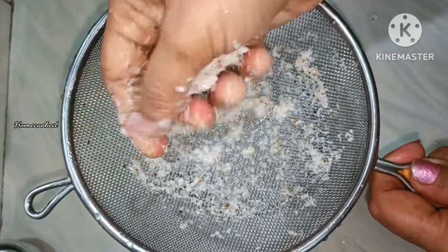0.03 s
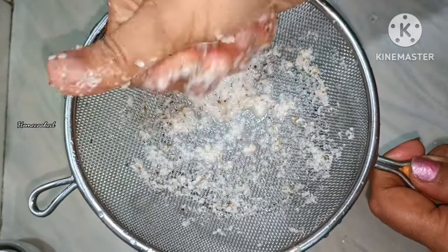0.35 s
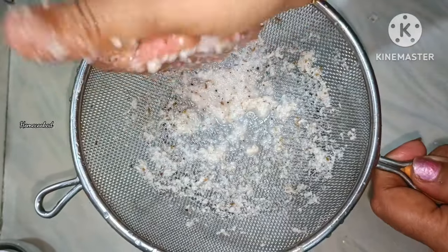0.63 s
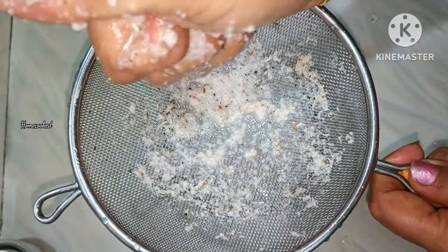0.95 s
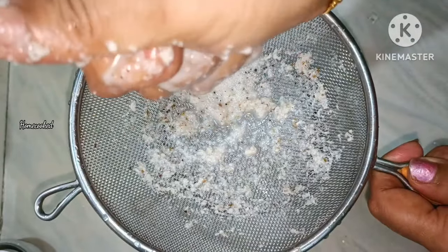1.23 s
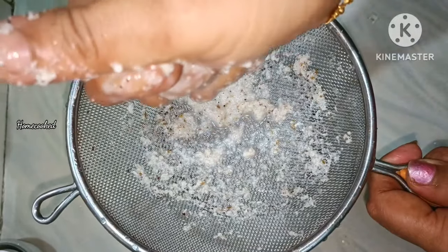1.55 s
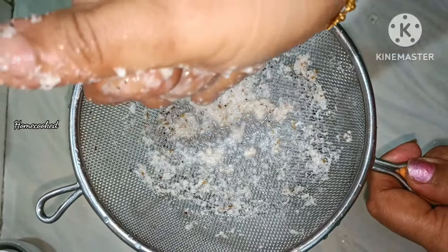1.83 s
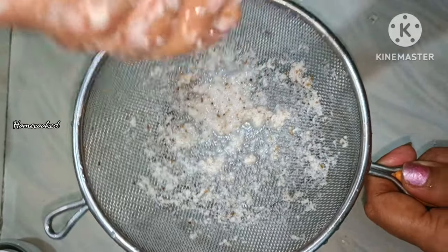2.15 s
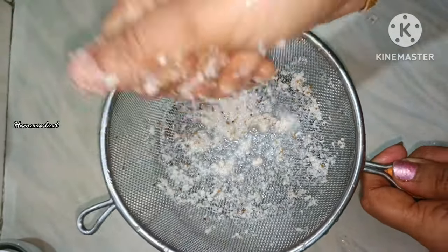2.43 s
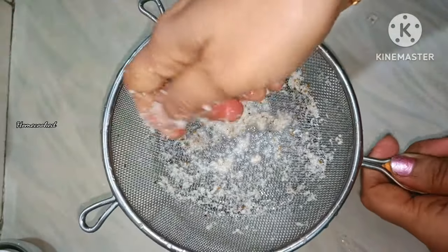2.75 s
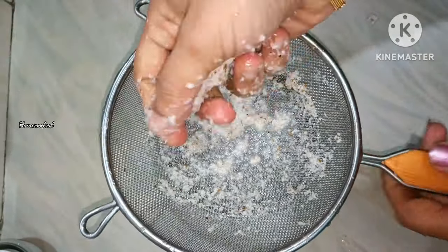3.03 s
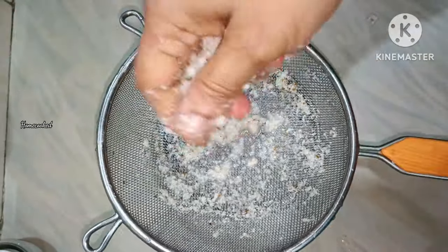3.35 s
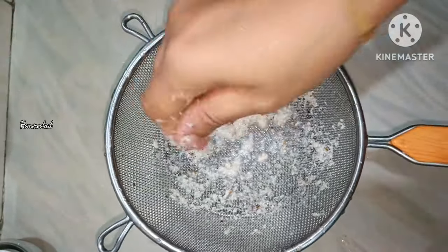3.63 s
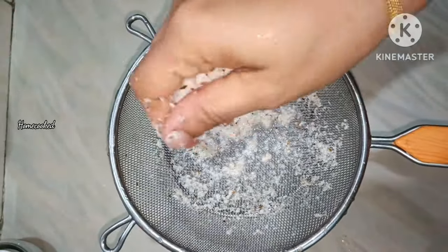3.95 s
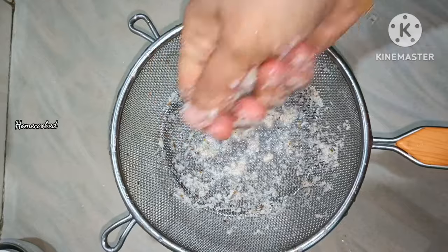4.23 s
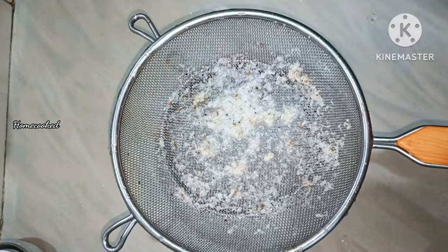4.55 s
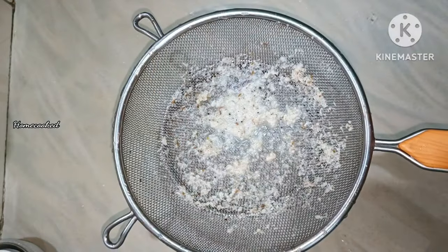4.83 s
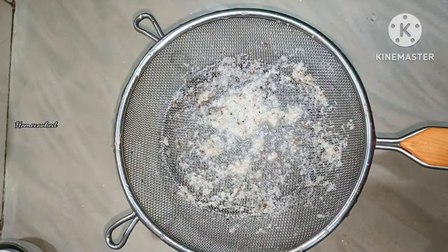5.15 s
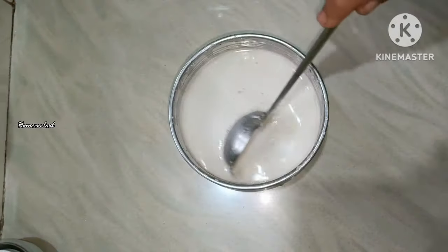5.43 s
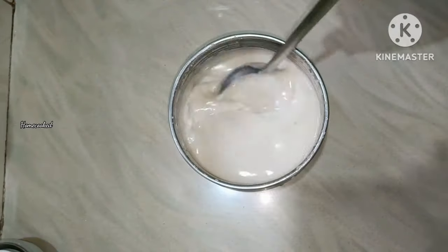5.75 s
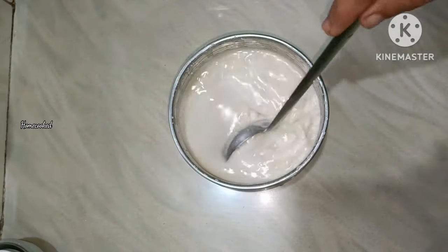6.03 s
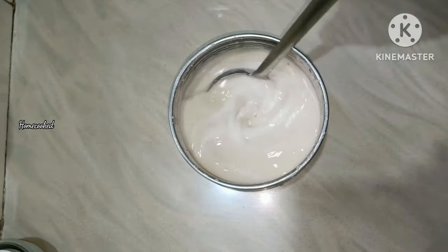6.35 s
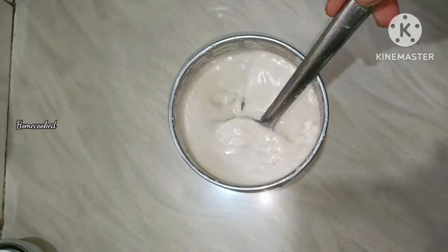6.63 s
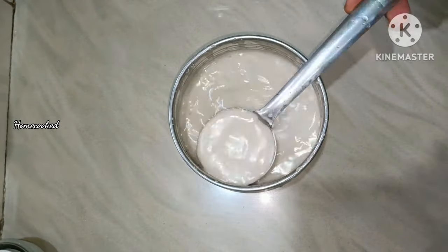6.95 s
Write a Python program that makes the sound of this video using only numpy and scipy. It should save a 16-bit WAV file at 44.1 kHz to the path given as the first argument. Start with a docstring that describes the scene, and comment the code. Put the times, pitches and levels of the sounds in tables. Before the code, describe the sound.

Wet pulp is squeezed by hand, with small drips and spits, then a spoon stirs liquid and knocks against a steel pot.

```python
"""Wringing and stirring coconut milk

Close stereo microphone in a small, hard-walled kitchen, its hiss under everything. A hand wrings wet
ground coconut over a mesh strainer: air pockets snap, milk spits between the fingers, drops plink into
the pot below and the strainer bumps the rim. Then a spoon stirs the milk and knocks against the full
steel pot, whose ring the liquid damps."""
import sys
import numpy as np
from scipy import signal
from scipy.fft import rfft, irfft, next_fast_len
from scipy.io import wavfile
from scipy.ndimage import map_coordinates

SR = 44100
rng = np.random.default_rng(int(sys.argv[2]) if len(sys.argv) > 2 else 0)


def int16_out(signal):
    """Quantize to a 16-bit WAV file."""
    q = np.round(np.clip(np.atleast_2d(signal).T, -1, 1) * 32767)
    wavfile.write(sys.argv[1], SR, q.astype(np.int16))


N = 307801
TIME = np.arange(N) / SR
AGE = np.arange(SR // 2) / SR  # seconds since the start of one short sound


def amp(db):
    """Decibels to gain."""
    return 10 ** (np.asarray(db) / 20)


def unit(x):
    """x at rms 1."""
    return x / np.sqrt(np.mean(x ** 2) + 1e-20)


def along(points, hz):
    """(Hz, value) points read on a log axis."""
    f, values = np.transpose(points)
    return np.interp(np.log(hz + 1), np.log(f + 1), values)


def fade(t, t60):
    """Exponential decay, 60 dB down at t60."""
    return np.exp(-np.log(1000) * t / t60)


def bell(half_length):
    """A smooth swell that peaks three half lengths after its start."""
    t = np.arange(-3 * half_length, 3 * half_length, 1 / SR)
    return np.exp(-0.5 * (t / half_length) ** 2)


def wobble(size, rate):
    """A smooth random curve, rate knots a second."""
    knots = rng.standard_normal(int(size * rate / SR) + 2)
    return map_coordinates(knots, [np.arange(size) * rate / SR])


def add(track, s, sound):
    """Mix a sound into a track at s seconds."""
    part = track[..., round(s * SR):][..., :sound.shape[-1]]
    part += sound[..., :part.shape[-1]]


def filtered(x, response):
    """x through a frequency response."""
    size = x.shape[-1]
    padded = next_fast_len(size + SR // 4)
    return irfft(rfft(x, padded) * response(np.fft.rfftfreq(padded, 1 / SR)), padded)[..., :size]


def coloured(x, spectrum):
    """x shaped by (Hz, dB) points, at rms 1."""
    return unit(filtered(x, lambda hz: amp(along(spectrum, hz))))


def resonant(x, peaks):
    """x with the bands of some (Hz, width Hz, dB) resonances lifted."""
    return filtered(x, lambda f: 1 + sum(amp(db) * 1j * f * width / (hz * hz - f * f + 1j * f * width)
                                         for hz, width, db in peaks))


def ring(hz, t60, attack, fall=0):
    """A damped vibration that takes a moment to build; its pitch may fall, in octaves a second."""
    octaves = np.cumsum(fall * np.ones(len(AGE))) / SR
    turns = hz * (np.cumsum(2 ** -octaves) - 1) / SR
    return np.sin(2 * np.pi * turns) * fade(AGE, t60) * (1 - np.exp(-AGE / attack))


def crackle(rate, size):
    """Random tiny impulses, rate a second."""
    return (rng.random(size) < rate / SR) * rng.standard_normal(size)


def swarm(size, hz, octaves, rate=4000):
    """Tiny bursts, rate a second, that ring in a band round hz; rms 1."""
    bursts = crackle(rate, size)
    return unit(filtered(bursts, lambda f: 1 / (1 + (np.log2((f + 1) / hz) / octaves) ** 2) ** 0.81))


def placed(x, lead, pan_db=0):
    """At the microphone: the left port hears x lead seconds earlier and pan_db louder than the right."""
    sides = np.array([[1], [-1]])
    return filtered(x, lambda hz: np.exp(1j * np.pi * hz * lead * sides)) * amp(sides * pan_db / 2)


# the kitchen's decay: f/Hz, t60/s
KITCHEN_DECAY = [(100, 0.67), (400, 0.74), (1200, 0.31), (2500, 0.59), (9000, 0.045)]
# standing waves between the worktop and the walls: f/Hz, width/Hz, level/dB
STANDING_WAVES = [(423, 17, 0.5), (485, 8.6, -1), (648, 8.8, 4), (754, 8.8, -8), (846, 13, 0), (948, 22, 4),
                  (1287, 8.9, -1)]

def kitchen(x, wet_db, alike, gap):
    """A close sound and the room's answer gap seconds later; alike weights what both ports share."""
    left, right, shared = rng.standard_normal((3, SR // 2))
    hz, t, bands = signal.stft(np.array([left, right]) + alike * shared, SR, nperseg=256)
    decay = fade(t, along(KITCHEN_DECAY, hz)[:, None])
    tail = signal.istft(bands * decay, SR, nperseg=256)[1][:, :len(AGE)]
    early_lift = 1 + 2.2 * fade(AGE, 0.092)  # the worktop and near walls come first
    tail = resonant(tail * (AGE > gap) * early_lift, STANDING_WAVES)
    wet = signal.fftconvolve(x.mean(axis=0)[None], tail / np.linalg.norm(tail[0]), axes=1)
    return x + amp(wet_db) * wet[:, :x.shape[1]]


# the quiet kitchen's spectrum: f/Hz, level/dB
MURMUR_TONE = [(20, -8), (65, 6), (120, 5.5), (185, -1), (225, 7), (285, -3.5), (340, -3), (410, 3),
               (470, -5), (510, 4), (630, -3.5), (695, 8.5), (860, -10), (950, 2.5), (1040, -5.5),
               (1150, -10.5), (2000, -8), (4000, -42)]
# how alike it is at the two ports: f/Hz, correlation
MURMUR_LIKENESS = [(60, 0.75), (290, 0.35), (640, 0.45), (1400, 0.54)]

def room_murmur():
    """Low room tone all round the microphone, partly shared by both ports."""
    def mid_side_gains(hz):
        angle = np.arccos(np.clip(along(MURMUR_LIKENESS, hz), -1, 1)) / 2
        return np.array([np.cos(angle), np.sin(angle)])
    mid, side = filtered(rng.standard_normal((2, N)), mid_side_gains)
    murmur = amp(-69.5) * coloured(np.array([mid + side, mid - side]), MURMUR_TONE)
    return placed(murmur, lead=0.00023)


# hiss spectra of the left and right microphone ports: f/Hz, level/dB
LEFT_PORT = [(300, -20.5), (1200, -9.5), (1550, -12.5), (2330, -6), (3450, -4), (4820, -0.5), (5080, -6),
             (5340, 6.5), (5600, -2.5), (5860, -3), (6120, -0.5), (6370, -4), (6720, -6), (6980, 2),
             (7240, -7), (7670, 4), (8010, -3.5), (8270, 3.5), (8530, 2.5), (9470, 3), (10420, -3.5),
             (11110, 0.0), (14560, -9.5), (14900, -22), (15160, -4), (15250, -26.0), (15330, -49.0),
             (15500, -55.0), (15700, -32)]
RIGHT_PORT = [(300, -21.5), (1200, -12.5), (1550, -9.5), (1810, -19), (2070, -6.5), (2760, -10),
              (3010, -0.5), (3450, -6.5), (4220, 0.5), (4910, 0), (5170, 2.5), (5860, 3), (6030, -1.5),
              (6200, 0.5), (7150, -2), (8100, -1.5), (8700, -10), (9040, -2), (9390, -0.5), (10080, -3),
              (11370, 0), (12320, -7), (13180, 0.5), (14380, 0), (14640, 6), (14900, -3), (15250, 6.5),
              (15500, 5), (15700, -45)]
HISS_BEFORE_DB, HISS_AFTER_DB, HISS_STEP_S = -46.5, -50, 5.53

def microphone_hiss():
    """Each port's own hiss, coloured by its narrow duct; the level steps down at 5.53 s."""
    hiss = np.array([coloured(rng.standard_normal(N), tone) for tone in (LEFT_PORT, RIGHT_PORT)])
    return amp(np.where(TIME < HISS_STEP_S, HISS_BEFORE_DB, HISS_AFTER_DB)) * hiss


# dry ticks close up, from air pockets in wet pulp and froth, the last (5.966 s) from the spoon: t/s, level/dB,
# f/Hz
DRY_TICKS = [(.069, -33, 6400), (0.302, -29, 6250), (0.522, -27, 6200), (0.618, -30, 5200),
             (.683, -29, 11600), (.691, -26, 11000), (0.723, -27, 3750), (0.7485, -24, 8750),
             (0.7628, -27, 8300), (0.967, -25, 8500), (0.9866, -18.5, 8600), (1.064, -25, 8650),
             (1.079, -18.5, 8900), (1.082, -29, 8800), (1.193, -25.5, 8300), (1.8774, -21, 8900),
             (2.1752, -21.5, 4300), (5.966, -20, 5170)]

def ticks():
    """Dry, faintly pitched ticks: single air pockets break in the pulp, and once the spoon ticks."""
    out = np.zeros(N)
    for s, db, hz in DRY_TICKS:
        spray_tone = [(hz / 6, -55), (hz / 2, -26), (hz, 0), (2 * hz, -12)]
        spray = coloured(rng.standard_normal(len(AGE)), spray_tone) * fade(AGE, 0.0086)
        tick = ring(hz, 0.0026, attack=0.0006) + 0.4 * spray
        add(out, s, amp(db) * tick / np.abs(tick).max())
    return kitchen(placed(out, lead=0.00004), wet_db=-2.5, alike=0.49, gap=0.00066)


# drops landing in the pot, just left of centre:
# t/s, relative level/dB, bubble f/Hz, t60/cycles, pitch rise/(octaves/s), relative room level/dB
MILK_DROPS = [(0.079, -28, 1235, 19, -26, -10.5), (0.143, -33.5, 2500, 8.4, 28, -5.5),
              (0.348, -12.5, 1960, 16.5, 61, -15.5), (0.3833, -23, 3170, 21, 21, -11.5),
              (0.577, -37.5, 3040, 14, 40, -6), (0.589, -33, 2910, 29, 14.5, -15),
              (0.601, -35, 2175, 19, 6, -13), (1.368, -39.5, 3250, 12, 30, -8),
              (1.898, -31.5, 1250, 18, 28, -12), (2.168, -40.5, 1680, 32, 13, -11),
              (2.176, -22, 3230, 25, 47, -14.5), (2.263, -19, 2103, 22, 15, -15.5),
              (2.503, -44, 1260, 47, 4, -22), (3.809, -51, 2040, 27, 5, -6),
              (3.9931, -45.5, 2380, 24, 10, -14), (4.0335, -51, 2200, 18, 10, -10),
              (4.256, -53.5, 980, 23, 6, -11.5), (4.697, -47, 2110, 14, 10, -5)]
RISE_S = 0.0096  # a bubble's pitch glides only while it nears the surface
TAIL_OCTAVES = 0.24  # the afterring stays this close to the bubble's pitch

def drops():
    """Each drop slaps the milk and traps a bubble that rings briefly in the thick liquid."""
    out = np.zeros((2, N))
    low_cut = signal.butter(4, 900, "high", fs=SR, output="sos")
    for s, db, hz, cycles, rise, wet_db in MILK_DROPS:
        bubble = ring(hz, cycles / hz, attack=0.00036, fall=-rise * (AGE < RISE_S))
        spray = 0.1 * rng.standard_normal(len(AGE)) * fade(AGE, 0.062)
        slap = ring(1790, 0.0062, attack=0.0015) + ring(3600, 0.0068, attack=0.00061) + spray
        slap_db = -14 + 17.5 * np.log2(hz / 2020)  # the smaller the bubble, the more slap is heard
        plink = signal.sosfilt(low_cut, bubble + amp(slap_db) * slap)
        plink = amp(db + 2.5) * plink / np.abs(plink).max()
        direct = placed(plink, lead=0.00007, pan_db=2.5)
        tail = kitchen(direct, wet_db=wet_db + 6.5, alike=0.35, gap=0.0049) - direct
        tail_hz = hz * 2 ** (rise * 0.0033)  # the bubble's pitch partway through its glide
        tail = filtered(tail, lambda f: 1 / (1 + 1j * np.log2((f + 1) / tail_hz) / TAIL_OCTAVES))
        add(out, s + 0.00049, direct + tail)
    return out


# fingers kneading the pulp above the pot: t/s, level/dB, half length/s, f/Hz
KNEADS = [(0.33, -69.5, 0.092, 265), (0.618, -50, 0.0051, 780), (0.715, -57.5, 0.04, 820),
          (1.325, -60.5, 0.013, 770), (1.699, -56, 0.016, 640), (3.236, -65.5, .11, 370),
          (3.274, -65.5, 0.056, 1020), (3.71, -59.5, 0.035, 690), (3.793, -60, 0.026, 1100),
          (4.044, -60, 0.02, 990), (4.257, -63, 0.0085, 980), (4.734, -62.5, 0.036, 635)]
# the air in the pot under the strainer: f/Hz, width/Hz, level/dB
POT_CAVITY = [(400, 130, 3), (688, 73, 5), (972, 49, 3), (1035, 45, 3), (2070, 120, 27.5)]

def squelches():
    """The pulp gives way in uneven lumps, with sparse bursts that sound the pot's air."""
    out = np.zeros(N)
    for s, db, half_length, hz in KNEADS:
        swell = bell(half_length)
        lumps = amp(2.5 * wobble(len(swell), rate=90))
        bursts = swarm(len(swell), hz, octaves=0.33, rate=900)
        squelch = unit(resonant(lumps * bursts, POT_CAVITY))
        add(out, s - 3 * half_length, amp(db) * swell * squelch)
    return out


# the fist tightening over the strainer: t/s, level/dB, half length/s
FIST_SQUEEZES = [(0.752, -34.5, 0.012), (0.976, -45, 0.01), (1.083, -39.5, 0.0066), (1.201, -52.5, 0.024)]

def spits():
    """Milk seeps with a broad fizz, then spits as a fine spray through the gaps between the fingers."""
    out = np.zeros(N)
    def spray(s, db, half_length, hz, octaves):
        swell = bell(half_length)
        add(out, s - 3 * half_length, amp(db) * swell * swarm(len(swell), hz, octaves))
    for s, db, half_length in FIST_SQUEEZES:
        spray(s - 5.7 * half_length, db - 9, 2.6 * half_length, hz=7700, octaves=1)  # seep
        spray(s, db, half_length, hz=8270, octaves=0.19)  # spit
    # only the hardest squeeze splatters onto the mesh
    s, _, half_length = max(FIST_SQUEEZES, key=lambda row: row[1])
    spray(s + half_length / 2, -44, half_length, hz=2530, octaves=0.29)
    return out


def pulp():
    """The hand wrings the pulp close to the microphone, off to the left."""
    direct = placed(spits() + squelches(), lead=0.000216, pan_db=7.5)
    return kitchen(direct, wet_db=-7, alike=0.92, gap=0.00274)


# the strainer's mesh, first row at the bump: t/s, level/dB, f/Hz, t60/s, width/octaves
MESH_RATTLES = [(2.621, -46, 1400, 0.053, 0.67), (2.622, -42, 2200, 0.032, 0.26),
                (1.5, -42, 8000, 0.02, 0.9)]
# pot and strainer ringing after the bump: f/Hz, level/dB, t60/s, attack/s
RIM_MODES = [(90, -48, 0.38, 0.018), (121, -50, 0.3, 0.028), (250, -51, 0.2, 0.0092),
             (404, -55, 0.26, .008), (1001, -59, 0.42, .003)]

def strainer():
    """The mesh gives one high tick; later it bumps the rim and rattles, and the pot hums briefly."""
    rattle, hum = np.zeros((2, N))
    for s, db, hz, t60, octaves in MESH_RATTLES:
        add(rattle, s, amp(db) * swarm(len(AGE), hz, octaves) * fade(AGE, t60))
    bump_s = MESH_RATTLES[0][0]
    add(hum, bump_s, sum(amp(db) * ring(hz, t60, attack) for hz, db, t60, attack in RIM_MODES))
    return hum + kitchen(placed(rattle, lead=0.0001), wet_db=-4, alike=0.68, gap=0.0033)


def struck(modes, pitch=1):
    """A group of steel modes, a little different at each blow; peak 1."""
    sound = np.zeros(len(AGE))
    for hz, db, t60 in modes:
        gain = amp(db + rng.normal(0, 0.57))
        detune = 1 + rng.normal(0, 0.0079)
        sound += gain * ring(pitch * hz * detune, t60, attack=0.0028)
    return sound / np.abs(sound).max()


# spectra of the spoon's click and of its sharp edge: f/Hz, level/dB
CLICK_SPECTRUM = [(800, -37), (2800, 2.5), (3800, 2), (4400, -3.5), (5100, 16), (6200, 7.5), (8300, 3),
                  (10500, -11), (13000, -10), (15300, -20)]
EDGE_SPECTRUM = [(2000, -28), (7500, -6), (9000, 8), (11500, -11), (14500, 6)]
# the spoon's own ring: f/Hz, level/dB, t60/s
SPOON_MODES = [(4570, 2, 0.13), (5582, -1, 0.18), (7620, 0, .2), (8600, -7, .15), (15150, 3, 0.13)]

def steel_click():
    """Steel meets steel with a sharp-edged click that leaves the spoon ringing."""
    click = coloured(rng.standard_normal(len(AGE)), CLICK_SPECTRUM) * fade(AGE, 0.036)
    ringing = struck(SPOON_MODES)
    edge = coloured(rng.standard_normal(len(AGE)), EDGE_SPECTRUM) * fade(AGE, 0.02)
    return click + amp(-11) * ringing + amp(-8.5) * edge


# the spoon against the pot, close up, the 6.724 s row being the near wall's strong return of the knock before
# it; # thud, upper modes and click are set against the lower wall modes: # t/s, relative level/dB, wall f/Hz,
# thud level/dB, upper f/Hz, upper level/dB, click level/dB
SPOON_KNOCKS = [(5.455, -38.5, 1325, -14, 2150, -9, -23), (5.7347, -32.5, 1235, -43, 2150, -23, -27),
                (5.8574, -17.5, 1363, -38, 2197, 2.5, 1.5), (5.8675, -28, 1400, -25, 2190, 6, -8),
                (5.9484, -29, 1470, -26, 2160, -12, -25), (5.972, -31.5, 1390, -22, 2100, -1, -17),
                (5.979, -32.5, 1560, -14, 2180, 2, -11), (6.083, -43.5, 1350, -25, 2690, 7, 17.5),
                (6.184, -44.5, 1450, -35, 2090, -1, -25), (6.196, -36, 1370, -30, 2130, -6, -25),
                (6.4895, -24.5, 1288, -22.5, 2150, 2, -2.5), (6.522, -43, 1370, -20, 2090, 16, -10),
                (6.5324, -28.5, 1530, -16, 2040, 7.5, -11), (6.7099, -5, 1263, -12, 2240, -11, -24.5),
                (6.724, -26, 1340, -5, 2210, -8, -24), (6.741, -31, 1300, -7, 2356, -1, -13),
                (6.871, -8.5, 1119, -25, 2160, -8.5, -18), (6.877, -15.5, 1460, -28, 3000, -9, -25),
                (6.8877, -18.5, 1412, -18, 3030, -16, -25)]
# the milk-filled pot, struck on the bottom: f/Hz, level/dB, t60/s
BOTTOM_MODES = [(87.6, -35, 0.85), (243.4, -32, 0.81), (364, -26, 0.75), (455, -4.5, 0.075),
                (610, 1.5, 0.051), (787, 17, 0.022)]
# wall modes that shift with the sloshing milk and the point of contact: frequency ratio, level/dB, t60/s
LOWER_WALL_MODES = [(.83, -18, 0.1), (.93, -9.5, 0.092), (1, 19, 0.017), (1.002, -29, 0.23),
                    (1.11, 4, .035), (1.2, -39, 0.042), (1.33, -6, 0.028)]
UPPER_WALL_MODES = [(1, 15.5, 0.012), (1.1, 7, 0.019), (1.39, -0.5, 0.022), (1.7, 2, 0.016)]
ECHO_S = 0.0145  # a nearby kitchen wall throws each knock back

def knocks():
    """The spoon knocks on the milk-damped pot: dull on the bottom, brighter on the wall."""
    out = np.zeros((2, N))
    for s, db, wall_hz, thud_db, upper_hz, upper_db, click_db in SPOON_KNOCKS:
        click = steel_click()
        body = struck(LOWER_WALL_MODES, wall_hz)
        body += amp(thud_db) * struck(BOTTOM_MODES)
        body += amp(upper_db) * struck(UPPER_WALL_MODES, upper_hz)
        knock = amp(db - 4.5) * (body + amp(click_db) * click)
        add(out, s, kitchen(placed(knock, lead=0.00009), wet_db=-6.5, alike=0.58, gap=0.0032))
        add(out, s + ECHO_S, amp(db - 26) * body)
    return out


# strokes of the spoon round the pot: t/s, length/s, level/dB, opening surge/dB
SPOON_STROKES = [(5.467, 0.12, -59.5, 5), (5.649, 0.16, -59, 4), (5.852, 0.26, -52.5, 16.5),
                 (6.454, 0.11, -48.5, -1.5), (6.597, 0.1, -48.5, 3.5), (6.698, 0.32, -55, 0)]
BITE_S, SURGE_S, SETTLE_T60_S = 0.0081, 0.029, 0.22

def spoon_drag():
    """How hard the spoon drags: each stroke bites with a surge, holds while the milk laps, and fades."""
    drag = np.zeros(N)
    for s, length, db, surge_db in SPOON_STROKES:
        held = np.minimum(TIME / BITE_S, 1) * fade(np.maximum(TIME - length, 0), SETTLE_T60_S)
        add(drag, s, held * amp(db + surge_db * np.exp(-TIME / SURGE_S)))
    lapping = amp(2.5 * wobble(N, rate=27))
    return drag * lapping


# spectrum of the spoon's scrape in the pot: f/Hz, level/dB
SCRAPE_TONE = [(150, -51), (250, -6.5), (350, -66), (800, -12), (1270, 5.5), (1800, -14), (2400, -5),
               (3300, -7.5), (8000, -12)]
# the pot's resonance moves as the milk rises and falls: t/s, pitch ratio
POT_PITCH = [(5.6, 1.01), (5.68, 0.94), (5.8, 1.11), (5.97, 1.17), (6.12, 0.98), (6.2, 1.19), (6.6, .93),
             (6.66, 1.03), (6.98, 0.91)]
# large bubbles and hollow sloshes, and the pot's low mode ringing near 250 Hz: t/s, level/dB, f/Hz, t60/s,
# pitch fall/(octaves/s)
GLOOPS_AND_POT_RINGS = [(5.875, -46.5, 247, 0.22, 0), (5.94, -45.5, 547, 0.094, 3.5), (5.987, -59.5, 255, 0.59, 1),
                        (6.5092, -27, 715, 0.025, 119), (6.52, -51, 247, 0.15, 0), (6.64, -34, 806, 0.041, 0)]

def stirring():
    """The spoon scrapes round the pot and folds the milk into large bubbles; now and then the pot's low mode
    hums."""
    scrape = coloured(crackle(rate=1700, size=N), SCRAPE_TONE)
    pitch = np.interp(TIME, *np.transpose(POT_PITCH))
    stir = spoon_drag() * map_coordinates(scrape, [np.cumsum(pitch)], mode="wrap")
    for s, db, hz, t60, fall in GLOOPS_AND_POT_RINGS:
        add(stir, s, amp(db) * ring(hz, t60, attack=0.0074, fall=fall))
    return kitchen(placed(stir, lead=0.00005), wet_db=-6.5, alike=0.24, gap=0.00486)


def spoon():
    """Stirring and knocks together, 2 dB louder at the left port than at the right."""
    return (stirring() + knocks()) * amp([[1], [-1]])


def scene():
    """Wringing, then stirring, from one microphone position beside the pot."""
    return drops() + pulp() + ticks() + strainer() + spoon() + room_murmur() + microphone_hiss()


TOP_HZ = 15750

def record(dry):
    """The recorder keeps nothing above its band limit."""
    return filtered(dry, lambda hz: hz < TOP_HZ)


dry = scene()
out = record(dry)
int16_out(out)
```